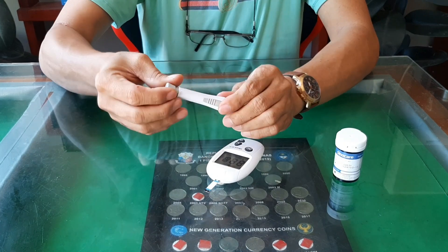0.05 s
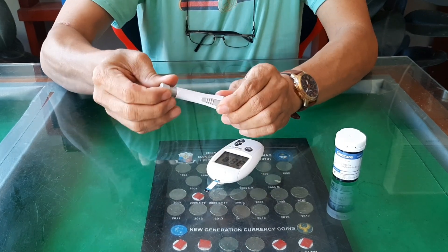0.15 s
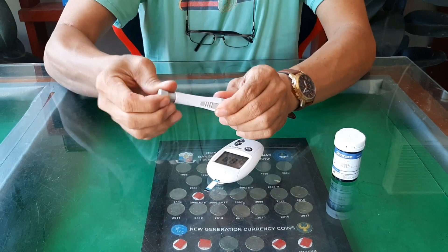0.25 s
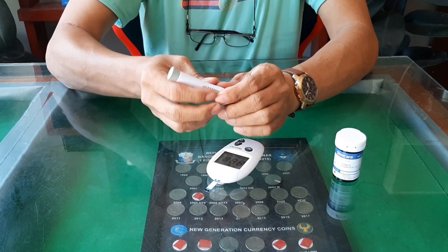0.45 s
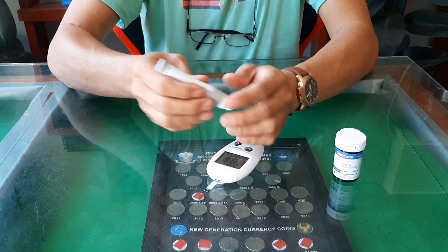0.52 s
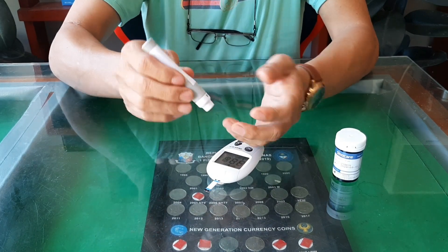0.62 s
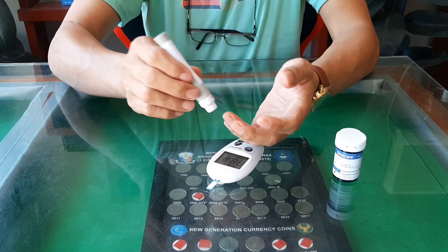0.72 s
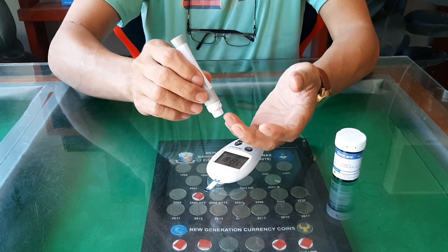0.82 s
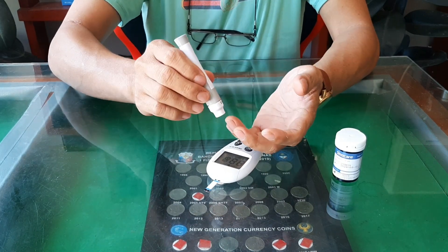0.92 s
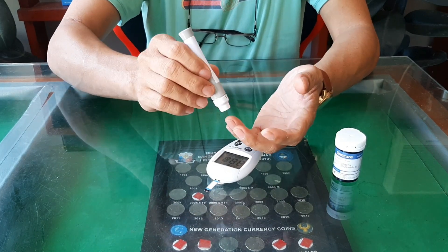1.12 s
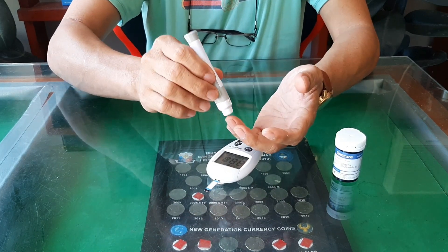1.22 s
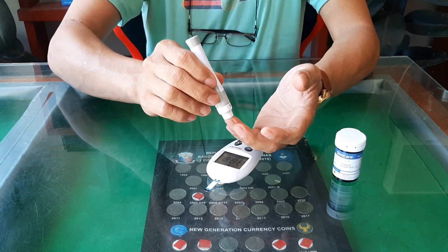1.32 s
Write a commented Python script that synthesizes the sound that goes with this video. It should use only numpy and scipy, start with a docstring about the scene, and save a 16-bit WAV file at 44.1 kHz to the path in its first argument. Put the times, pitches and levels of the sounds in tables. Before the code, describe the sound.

A plastic spring pen is pulled and cocked close by: a faint tick at 0.13 s with a light sleeve scrape, a modest snap at 0.22, a soft coil rustle and tick near 0.38, then a very loud, bright snap at 0.43 with a small aftertick. The hard room rings briefly. Quiet hiss and low traffic continue; faint bird chirps come at 0.0, 0.77 and 1.2, and a barely audible tone swells after 0.9.

```python
"""A plastic spring pen ticks, snaps, ticks and snaps again as it is pulled and cocked above a glass table. Each
contact of its catch is a short rattle that rings the barrel, then the table and a hard small room. Random
grains make the spring creak as it slides and the coil rustle; gliding sines make a bird chirp outside. A faint
steady tone swells and fades; shaped noise makes far traffic rumble and a stereo phone microphone hiss."""
import sys
import numpy as np
from scipy import signal
from scipy.fft import rfft, irfft, next_fast_len
from scipy.io import wavfile
from scipy.ndimage import uniform_filter1d, map_coordinates

SR = 44100
rng = np.random.default_rng(int(sys.argv[2]) if len(sys.argv) > 2 else 0)


def elevation(decibels):
    """Turn decibel levels (scalar or array-like) into linear amplitude ratios."""
    levels = np.asarray(decibels, float)
    return 10 ** (levels / 20)


def unload_audio(sound):
    """Save the sound as a 16-bit wav file, at the path given as the first command line argument."""
    columns = np.transpose(np.atleast_2d(sound))
    # keep every value between -1 and 1, then stretch to whole-number steps
    steps = np.round(np.clip(columns, -1, 1) * 32767)
    wavfile.write(sys.argv[1], SR, steps.astype(np.int16))


N = 59535
T = np.arange(N) / SR
# How long the room rings at each pitch: (frequency [Hz], time to fall by 60 dB [s])
ROOM_RING = [(200, 1), (1000, 0.3), (2000, 0.35), (4500, 0.3), (8000, 0.28), (14000, 0.25)]


def unit(x):
    """Scale to an rms of 1."""
    return x / np.sqrt(np.mean(x ** 2) + 1e-20)


def along(points, hz):
    """Read a curve of (frequency [Hz], value) points on a logarithmic frequency axis."""
    f, v = np.transpose(points)
    return np.interp(np.log(hz + 1), np.log(f + 1), v)


def filtered(x, response):
    """Filter x by multiplying its spectrum with a response, a function of frequency."""
    m = next_fast_len(x.shape[-1] + SR // 4)
    spectrum = rfft(x, m) * response(np.fft.rfftfreq(m, 1 / SR))
    return irfft(spectrum, m)[..., :x.shape[-1]]


def resonances(modes):
    """Response of parts that ring: a sum of modes (centre [Hz], width [Hz], level [dB])."""
    def response(f):
        total = 0
        for k, (centre, width, db) in enumerate(modes):
            damping = 1j * f * width
            # neighbouring modes have opposite signs
            total = total + (-1) ** k * elevation(db) * damping / (centre ** 2 - f ** 2 + damping)
        return total
    return response


def grains(count, per_s, spread_db):
    """Rows of impulses at random times, with random signs and uneven sizes."""
    size = elevation(spread_db * rng.exponential(size=(count, N)))
    return (rng.random((count, N)) < per_s / SR) * size * rng.choice([-1, 1], (count, N))


def room(x, t60s):
    """Stereo reverberation: builds up after the first wall, each frequency dying at its own speed."""
    # Colour of the reverberation: (frequency [Hz], relative level [dB])
    colour = [(100, -10), (700, -4), (2000, 1.5), (4500, 1), (8000, 5), (14000, 0.5)]
    wall_s, build_s = 0.0023, 0.0069  # silence before the first wall, then time constant of the build-up
    hz, t, z = signal.stft(rng.standard_normal((2, SR // 2)), SR, nperseg=256)
    fall_db = 60 * t / along(t60s, hz)[:, None]
    tail = signal.istft(z * elevation(along(colour, hz)[:, None] - fall_db), SR, nperseg=256)[1]
    t = np.arange(tail.shape[1]) / SR
    tail = tail * (1 - np.exp(-np.clip(t - wall_s, 0, None) / build_s))
    return signal.fftconvolve(x[None], tail / np.linalg.norm(tail[0]), axes=1)[:, :N]


def table_echoes(f):
    """Response of the direct sound plus later, duller copies from the glass top and near walls."""
    # Reflections: (delay [s], level [dB])
    echoes = [(.0024, -17), (.005, -13.5), (.0095, -16), (.015, -21.5)]
    shade_hz = 3500  # the hands shade the echoes above this
    copies = sum(elevation(db) * np.exp(-2j * np.pi * f * delay) for delay, db in echoes)
    return 1 + copies / (1 + 1j * f / shade_hz) ** 2


def clicks():
    """Each catch contact rattles and rings the barrel, heard apart at two ports; the room sums all directions."""
    # Catch contacts: (time [s], level [dB], rattle length [s], brightness [dB per octave])
    contacts = [(0.1348, -53.5, 0.0014, -1), (.2170, -33.5, 0.0029, -0.5), (0.381, -42, .001, -3),
                (0.4286, -13.5, .0005, 1.5), (0.458, -37.5, .002, -1), (.612, -58, 0.0027, -2.5)]
    # Ringing modes of the barrel: (centre [Hz], width [Hz], relative level [dB])
    barrel = [(1001, 251, -0.5), (1512, 120, 3.5), (2074, 250, 4), (2520, 300, -1), (3340, 560, -4),
              (4320, 470, -0.5), (5200, 150, -5), (6030, 310, -6.5), (7800, 800, -9.5), (10040, 1600, -9),
              (11550, 700, -6.5), (13500, 1300, -8.5), (14900, 1200, -10.5)]
    rise_s, t60_s = 0.00025, 0.0063  # rattle: time constant of its rise, time to fall by 60 dB
    alike = 0.34  # share of the rattle's power common to both ports
    rattle_above_hz = 2500  # the light rattle barely moves the low modes
    first_blow, port_lag_s = 3.1, 0.00014  # first impact beside the rattle; its delay at the right port
    push_db, push_hz, push_left_db = -24.5, 719, 19  # dull push of each click; left over right
    room_db = -0.5
    blur = 1.8  # summed over all directions, the modes are this many times wider
    blurred = [(hz, blur * width, db) for hz, width, db in barrel]

    out = np.zeros((2, N))
    t = np.arange(SR // 20) / SR
    push = -np.sin(2 * np.pi * push_hz * t) * np.exp(-4 * t * push_hz)
    push = push * elevation(push_db + push_left_db * np.array([[.5], [-.5]]))
    blow_s = rise_s + port_lag_s * np.array([[0], [1]])
    blow = np.arange(len(t)) == np.round(blow_s * SR)

    for s, db, length, tilt_db in contacts:
        start = round(s * SR)

        def tilt(f):
            return (1j * f / 4000 + 0.001023) ** (tilt_db / np.log2(64))

        def all_round(f):
            # the modes add as powers
            power = sum(abs(resonances([mode])(f)) ** 2 for mode in blurred)
            return np.sqrt(power) * abs(tilt(f))

        shape = (1 - np.exp(-t / rise_s)) * elevation(-60 * np.clip(t - length, 0, None) / t60_s)
        shared, *own = rng.choice([-1, 1], (3, len(t)))
        rattle = shape * (np.sqrt(alike) * shared + np.sqrt(1 - alike) * np.array(own))
        rattle = filtered(rattle, lambda f: 1j * f / (rattle_above_hz + 1j * f))
        ring = filtered(rattle + first_blow * blow, lambda f: resonances(barrel)(f) * tilt(f))
        # both ports get the energy of the rattle's shape
        ring = ring / np.linalg.norm(ring, axis=1)[:, None] * np.linalg.norm(shape)
        ring = filtered(ring, table_echoes)
        out[:, start:start + len(t)] += elevation(db) * (ring + push)

        spread = filtered(np.arange(N) == start, all_round)
        spread = spread * np.linalg.norm(shape) / np.linalg.norm(spread)
        out += elevation(db + room_db) * room(spread, ROOM_RING)
    return out


def scrape():
    """The spring slides and creaks: uneven stick-slip grains excite low ringing modes."""
    # Strength of the rubbing before the room joins in: (time [s], level [dB])
    rubbing = [(0, -67.5), (.118, -65.5), (.127, -56), (.15, -57.5), (.165, -52.5), (.19, -63.5),
               (.22, -63.5), (.33, -75), (.36, -87), (.42, -75.5), (.7, -75), (.8, -82), (1.15, -82.5),
               (1.21, -75.5), (1.32, -74), (1.35, -91)]
    # Ringing modes under the creak: (centre [Hz], width [Hz], relative level [dB])
    creak_modes = [(1020, 150, -13), (1510, 77.4, -1.5), (2070, 117, -7.5), (2850, 200, -16.5)]
    slips = grains(count=1, per_s=630, spread_db=1.5)[0]
    rub = unit(filtered(slips, resonances(creak_modes))) * elevation(np.interp(T, *np.transpose(rubbing)))
    # direct sound and room in equal parts
    return (rub + room(rub, ROOM_RING)) / np.sqrt(2)


def spring():
    """The coil rustles along the barrel wall: dense grains, separate at each port, ring its modes."""
    # Strength of the spring's dragging: (time [s], level [dB])
    drags = [(.13, -79), (.14, -60), (.17, -68), (.2, -70), (.378, -97), (.388, -56.5), (.396, -57),
             (.405, -62.5), (.411, -60.5), (.418, -64), (.427, -62.5), (.429, -89.5)]
    # Ringing modes of the coil: (centre [Hz], width [Hz], relative level [dB])
    coil = [(2180, 500, 0), (2680, 540, -5), (4200, 900, -3), (6700, 900, -5.5), (11650, 1340, -5),
            (13900, 1870, -8.5)]
    rustle = filtered(grains(count=2, per_s=4000, spread_db=2), resonances(coil))
    return unit(rustle) * elevation(np.interp(T, *np.transpose(drags)))


def bird():
    """Husky whistles glide from one pitch to another, mostly echo by the time they come indoors."""
    # Chirps before echo and balance: (time [s], length [s], from [Hz], to [Hz], level [dB])
    chirps = [(.0, .025, 5500, 3737, -65), (0.765, 0.13, 3604, 5595, -78.5),
              (1.192, .075, 5810, 3940, -66.5)]
    bend = 2.9  # how much faster the glide is at its start
    warble_hz = 251.5  # rms of the random pitch wobble
    rise, fall = 0.044, 0.35  # shares of the chirp's length
    balance_db = 5  # direct sound: this much up at the left, down at the right
    room_db, t60_s = 10, 0.6
    song = np.zeros(N)
    for s, length, from_hz, to_hz, db in chirps:
        u = np.clip((T - s) / length, 0, 1)  # progress through the chirp
        glide = (1 - np.exp(-bend * u)) / (1 - np.exp(-bend))
        warble = unit(uniform_filter1d(rng.standard_normal(N), size=40))
        hz = from_hz + (to_hz - from_hz) * glide + warble_hz * warble
        swell = np.clip(np.minimum(u / rise, (1 - u) / fall), 0, 1) * (u < 1)
        song += elevation(db) * swell * np.sin(2 * np.pi * np.cumsum(hz) / SR)
    direct = song * elevation(balance_db * np.array([[1], [-1]]))
    return direct + elevation(room_db) * room(song, [(4000, t60_s)])


def whine():
    """A faint sine of steady pitch swells and fades."""
    # Tones: (time [s], length [s], frequency [Hz], level [dB])
    tones = [(0.913, 0.44, 883, -79.5)]
    out = np.zeros(N)
    for s, length, hz, db in tones:
        swell = np.sin(np.pi * np.clip((T - s) / length, 0, 1)) ** .5
        out += elevation(db) * swell * np.sin(2 * np.pi * hz * T)
    return out


def rush(spectrum):
    """Stereo noise with the ports' likeness and balance; the average of the two ports has rms 1."""
    # Likeness of the two ports: (frequency [Hz], correlation [-1 to 1])
    likeness = [(40, 1), (130, 0.93), (290, 0.715), (640, 0.23), (1400, -0.18), (5000, 0.025),
                (15000, -0.11)]
    # Balance of the two ports: (frequency [Hz], left over right [dB])
    balance = [(60, 7), (180, 2), (550, 0.5), (1650, 1.0), (4970, 3), (15000, 0.5)]

    def mid_and_side(hz):
        # the angle sets how much the ports share
        angle = np.arccos(np.clip(along(likeness, hz), -1, 1)) / 2
        return elevation(along(spectrum, hz)) * [np.cos(angle), np.sin(angle)]

    mid, side = filtered(rng.standard_normal((2, N)), mid_and_side)
    pair = np.array([mid + side, mid - side])
    pair = filtered(pair, lambda hz: elevation(along(balance, hz) * [[.5], [-.5]]))
    return pair / np.std(pair.mean(0))


def traffic():
    """Far traffic: low noise whose level follows a curve and throbs at random."""
    # Colour of the rumble: (frequency [Hz], relative level per Hz [dB])
    colour = [(12, -61), (25, -32), (45, -17), (62, -1), (78, -8), (98, 4), (135, -8.5), (172, -5),
              (226, -8), (300, -11.5), (400, -19), (580, -48), (990, -120)]
    # Strength of the rumble before the throb: (time [s], level [dB])
    strength = [(0.0, -68), (0.026, -66.5), (0.09, -66.5), (0.116, -76.5), (0.156, -64), (0.382, -68),
                (0.436, -63), (0.596, -70.5), (0.608, -71.5), (0.714, -65.5), (0.762, -79.5), (0.796, -68),
                (0.856, -77), (0.894, -68.5), (1.048, -73), (1.202, -68), (1.322, -73), (1.35, -72.5)]
    throb_db, throbs_per_s = 1.76, 18
    knots = rng.standard_normal(int(N * throbs_per_s / SR) + 4)
    throb = map_coordinates(knots, [T * throbs_per_s])  # smooth curve through random points
    return elevation(np.interp(T, *np.transpose(strength)) + throb_db * throb) * rush(colour)


def hiss():
    """Smooth, steady noise of the microphone."""
    # Colour of the hiss: (frequency [Hz], relative level per Hz [dB])
    colour = [(210, -37.5), (350, -13), (523, -9), (620, -9.5), (900, -9.5), (1500, -9), (2600, -17.5),
              (4000, -13), (6000, -19.5), (7500, -24), (9000, -29.5), (10500, -26.5), (12500, -25.5),
              (15000, -22)]
    return elevation(-73.5) * rush(colour)


def scene():
    """All sources added together at the two microphone ports."""
    return clicks() + scrape() + spring() + bird() + whine() + traffic() + hiss()


def low_pass(x):
    """Removes everything above the highest recorded frequency."""
    return signal.sosfilt(signal.butter(12, 16530, fs=SR, output="sos"), x)


def record(dry):
    """The microphone's own colour: a dip and a steep edge in the treble."""
    # Treble response of the microphone: (frequency [Hz], level [dB])
    treble = [(7000, 0.5), (8900, -1), (10500, 2), (15350, 2), (15700, -18.5), (17000, -26)]
    mix = filtered(dry, lambda hz: elevation(along(treble, hz)))
    return low_pass(mix)


dry = scene()
out = record(dry)
unload_audio(out)
```